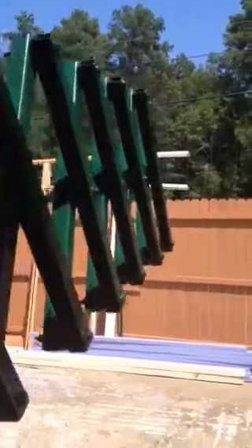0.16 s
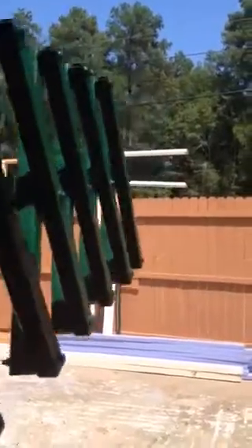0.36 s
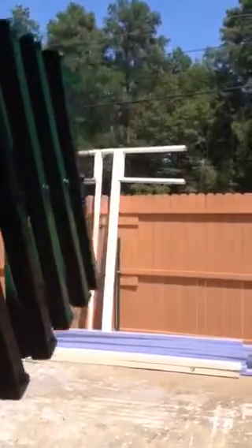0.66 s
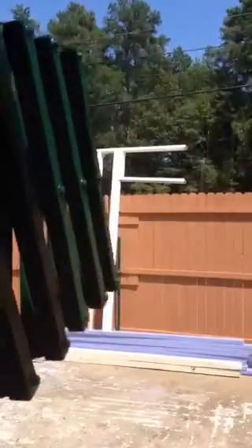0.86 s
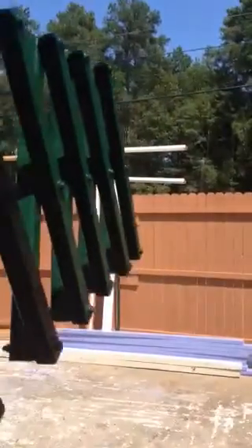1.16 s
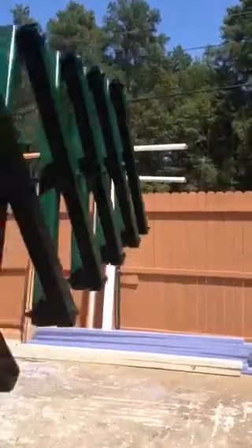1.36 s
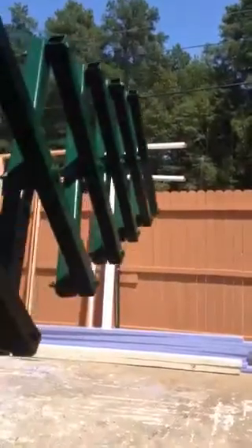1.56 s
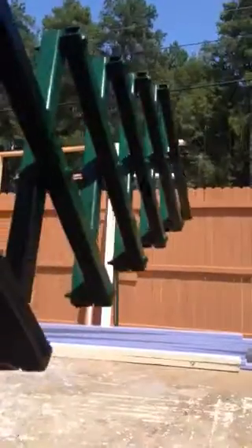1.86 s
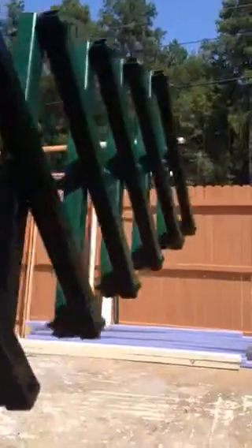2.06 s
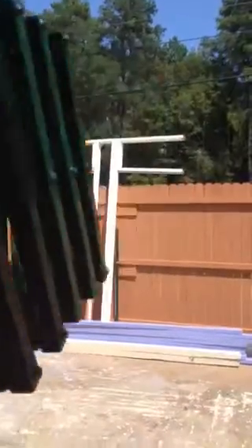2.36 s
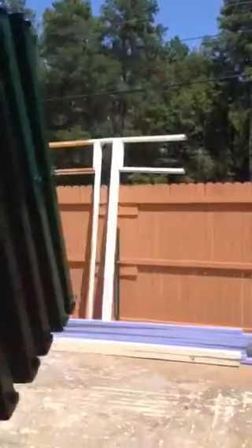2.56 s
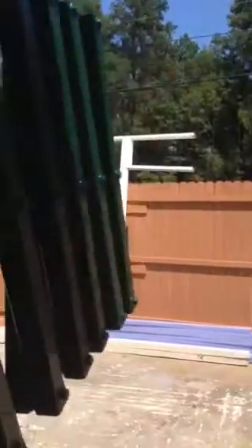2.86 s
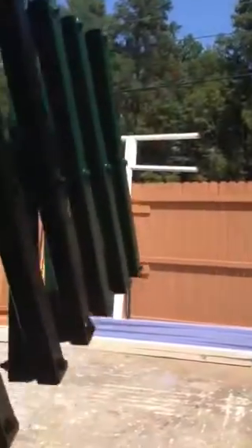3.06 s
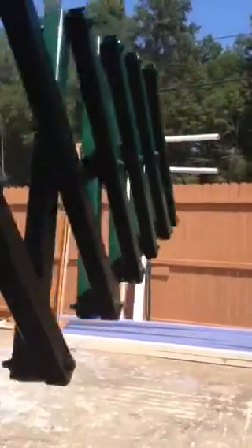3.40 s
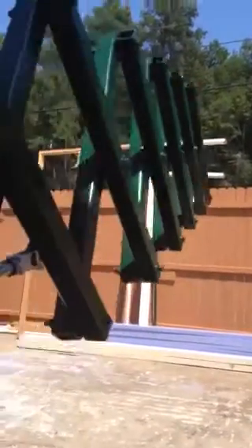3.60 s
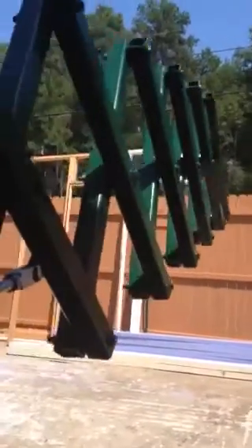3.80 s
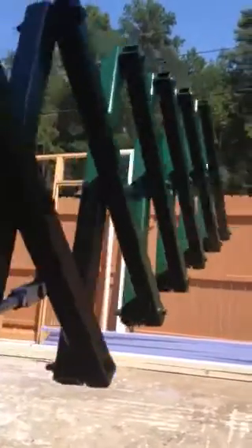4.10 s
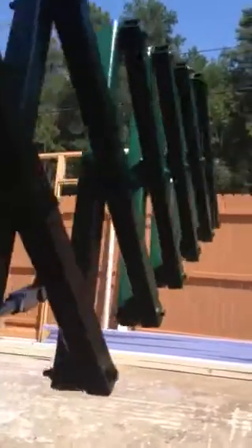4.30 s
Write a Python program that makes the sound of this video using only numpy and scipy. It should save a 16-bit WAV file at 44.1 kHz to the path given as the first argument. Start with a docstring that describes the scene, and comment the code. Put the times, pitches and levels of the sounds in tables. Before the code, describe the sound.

Compressed air hisses in three bursts as a steel linkage moves outdoors, with valve thumps, light clicks and a final hard clanking rattle.

```python
"""An air cylinder pushes and pulls a scissor linkage of steel tubes in a back yard, in three strokes.
Air hisses while the valve is open, the valve thumps, and spent air bleeds away. The joints tick
and rub, and around the last stroke the frame clanks and rattles hard, setting its tubes ringing.
A small engine drones far off under soft air in the trees. One microphone hears it all."""
import sys
import numpy as np
from scipy import signal
from scipy.fft import rfft, irfft
from scipy.io import wavfile
from scipy.ndimage import uniform_filter1d

SR = 44100
rng = np.random.default_rng(int(sys.argv[2]) if len(sys.argv) > 2 else 0)


def output_pcm(signal):
    """Save a mono or channel-first signal as 16-bit PCM at the path in sys.argv[1].

    Samples are clipped to [-1, 1] before scaling.
    """
    pcm = np.clip(np.atleast_2d(signal).T, -1, 1) * 32767
    wavfile.write(sys.argv[1], SR, np.round(pcm).astype(np.int16))


N = 195754
T = np.arange(N) / SR


def stroke_hiss(rush_db=-37, jet_db=1, whistle_db=-8.3, surge_s=.18, whistle_growth_db_per_s=.5):
    """The open valve rushes evenly; the jet and the port's whistle follow the flow of each stroke."""
    # Each row: valve opens and shuts in seconds, flow gain in dB, opening surge in dB,
    # build-up in dB per second (negative fades).
    strokes = [(-.05, .521, -31.5, 0, 5.5), (1.473, 2.301, -39.5, 10, 10.5), (3.943, 4.5, -27.5, -1.5, -9)]
    # Tone of the rush in the valve. Each row: frequency in Hz, gain in dB.
    rush_tone = [(300, -15), (1000, -8), (2300, -4.5), (2750, 0.5), (3600, -0.5), (4300, 3.5), (5500, 2),
                 (7200, 5), (9600, 1), (15500, -3.5)]
    # Tone of the bright jet. Each row: frequency in Hz, gain in dB.
    jet_tone = [(3000, -46), (5500, -23), (7200, -3), (8400, -3), (9800, -3.5), (12400, 3), (14000, 2.5),
                (15500, -3.5)]
    # Resonances of the exhaust port. Each row: frequency in Hz, width in Hz, gain in dB.
    port_peaks = [(6260, 230, 0), (7760, 180, -7)]
    rush = level(colour(rng.standard_normal(N), rush_tone), rush_db)
    jet = level(colour(rng.standard_normal(N), jet_tone), jet_db)
    whistle = level(resonate(rng.standard_normal(N), port_peaks), whistle_db)
    whistle *= undb(-walk(25.1))  # wavers by about 1 dB
    out = np.zeros(N)
    for opens, shuts, db, surge_db, build in strokes:
        age = np.clip(T, opens, shuts) - opens
        flow = undb(db + surge_db * np.exp(-age / surge_s) + build * age)
        exhaust = jet + whistle * undb(whistle_growth_db_per_s * age)
        out += gate(opens, shuts) * (rush + exhaust * flow)
    return out


def bleed(sag_db_per_s=28):
    """Air bleeds from the cylinder in a duller hiss that sags, then drops as the pressure gives out."""
    # Each row: start and end of pressure in seconds, gain in dB, final fall in dB per second.
    bleeds = [(0.512, 0.692, -37, 140), (2.293, 2.472, -37, 135), (3.686, 3.785, -35.5, 270)]
    # Tone of the escaping air. Each row: frequency in Hz, gain in dB.
    bleed_tone = [(300, 0), (1500, 4), (3200, -4), (5500, 0.5), (8400, 4.5), (10000, 3.5), (12800, 4),
                  (15500, 0)]
    hiss = level(colour(rng.standard_normal(N), bleed_tone), db=2)
    out = np.zeros(N)
    for starts, spent, db, fall in bleeds:
        sag_db = sag_db_per_s * (np.clip(T, starts, spent) - starts)
        fall_db = fall * np.maximum(T - spent, 0)
        out += gate(starts, T[-1]) * hiss * undb(db - sag_db - fall_db)
    return out


def gate(opens, shuts, opening_s=.004, closing_s=.026):
    """Air starts almost at once and dies quickly after the valve shuts."""
    return np.clip((T - opens) / opening_s + 1, 0, 1) * np.exp(-np.maximum(T - shuts, 0) / closing_s)


def valve_thumps(front_s=.00016, swing_hz=310, swing_db=4, fade_s=.0027):
    """A sharp pressure front, then a damped swing of the air in the hose."""
    # Each row: time in seconds, level in dB.
    thumps = [(0.5194, -23), (1.473, -32), (1.5459, -21.5), (1.5638, -21), (1.575, -30.5), (2.2998, -23.5)]
    out = np.zeros(N)
    for s, db in thumps:
        front = np.exp(-((T - s) / front_s) ** 2)
        age = np.maximum(T - s - front_s, 0)
        swing = -np.sin(2 * np.pi * swing_hz * age) * np.exp(-age / fade_s)
        out += undb(db) * (front + undb(swing_db) * swing)
    return out


def contact(s, db, hz, octaves, swell_s, fade_s, strike_db=10):
    """Steel meets steel in a shower of tiny impacts peaking at time s; the part's size sets the band."""
    size = 2 ** 15
    lead = size // 2
    age = (np.arange(size) - lead) / SR
    f = np.maximum(np.fft.rfftfreq(size, 1 / SR), 1)
    band = 1 / (1 + (np.log2(f / hz) / octaves) ** 4 / 2) * np.sqrt(hz / (f + hz))
    envelope = np.exp(np.where(age < 0, age / swell_s, -age / fade_s))
    impacts = rng.standard_normal(size)
    impacts[lead] = undb(strike_db)  # the main touch stands out of the shower
    shower = irfft(rfft(impacts) * band) * envelope
    shower *= undb(db) * np.linalg.norm(envelope) / np.linalg.norm(shower)
    return np.pad(shower, (int(s * SR), N))[lead:lead + N]


def clanks(swell_s=.00013, arm_lag_s=.00201):
    """Each hard blow is a wide, brief crack, with the short tone of the struck arm just behind."""
    # Each row: time in seconds, crack level in dB, crack centre in Hz, arm level in dB.
    blows = [(1.465, -35.5, 1214, -48), (2.458, -30, 7000, -50), (3.6622, -14, 2580, -15.5),
             (3.9261, -16.5, 4570, -17.5), (3.951, -20.5, 2900, -47), (4.066, -22.5, 3030, -34)]
    out = np.zeros(N)
    for s, db, hz, arm_db in blows:
        out += contact(s, db, hz, octaves=1.65, swell_s=swell_s, fade_s=.0069)
        out += contact(s + arm_lag_s, arm_db, hz=1560, octaves=.2, swell_s=swell_s, fade_s=.0075)
    return out


def rattles(octaves=1.55, swell_share=.24):
    """Many loose joints chatter at once: a quick swell and a longer fade."""
    # Each row: peak time in seconds, level in dB, centre in Hz, length in seconds.
    bursts = [(.65, -32.5, 1800, 0.0081), (1.562, -37, 1090, 0.02), (2.417, -35.5, 2000, 0.031),
              (2.436, -34, 2000, 0.0065), (2.473, -32.5, 900, 0.044), (2.495, -34, 2500, .022),
              (3.697, -36.5, 750, 0.049), (4.126, -26.5, 624, 0.049), (4.141, -19.5, 2700, 0.038),
              (4.1777, -16.5, 2050, 0.024), (4.199, -19.5, 1510, 0.06)]
    return sum(contact(s, db, hz, octaves, swell_share * length, (1 - swell_share) * length)
               for s, db, hz, length in bursts)


def clink(s, db, hz, swell_s, octaves=.34, cycles=13.3):
    """A part rings for a set number of cycles, so small, high ones stop sooner."""
    return contact(s, db, hz, octaves, swell_s, cycles / hz)


def clicks_and_clinks():
    """Short clicks and clinks of the valve and the joints."""
    # Each row: peak time in seconds, level in dB, centre in Hz, swell in seconds.
    touches = [(.653, -26, 4580, 0.0041), (1.333, -42.5, 4100, .003), (1.4642, -22.5, 6340, 0.00017),
               (1.672, -42.5, 1170, .003), (1.969, -35, 1570, 0.00061), (2.4415, -24.5, 4860, 0.00023),
               (2.5355, -31, 4670, 0.00072), (2.732, -36.5, 2800, 0.0013), (2.9795, -41, 1870, .0002),
               (3.835, -33, 900, .004)]
    return sum(clink(*touch) for touch in touches)


def pings():
    """Now and then a free part sings on with one note."""
    # Each row: peak time in seconds, level in dB, pitch in Hz.
    notes = [(.655, -37.5, 4010), (1.68, -43.5, 960), (1.974, -36, 2710), (2.417, -38, 4180),
             (2.443, -32.5, 4900), (3.768, -30, 1870)]
    return sum(contact(s, db, hz, octaves=.071, swell_s=.0041, fade_s=.014) for s, db, hz in notes)


def rubs(swell_share=.41):
    """A pivot scrapes as it turns, swelling almost as slowly as it fades."""
    # Each row: peak time in seconds, level in dB, centre in Hz, spread in octaves, length in seconds.
    scrapes = [(2.738, -41, 9000, 1.2, 0.032), (3.14, -49, 5000, 1.3, 0.049),
               (3.219, -41, 3170, 0.91, 0.017), (3.455, -56, 8450, .05, 0.087),
               (3.594, -53, 8100, 0.13, 0.079), (3.778, -30, 3660, 0.62, 0.041),
               (3.92, -35, 3760, 1.1, 0.02), (4.099, -32.5, 1570, 0.59, 0.021)]
    return sum(contact(s, db, hz, octaves, swell_share * length, (1 - swell_share) * length)
               for s, db, hz, octaves, length in scrapes)


def ticks(count=7, start_s=2.64, end_s=3.38, db=-50, scatter_db=2, hz=3920, scatter_octaves=.4):
    """Faint clinks at loose intervals while the linkage coasts with the valve shut."""
    slots, step = np.linspace(start_s, end_s, count, endpoint=False, retstep=True)
    out = np.zeros(N)
    for slot in slots:
        late, loud, high = rng.uniform(-1, 1, 3)
        s = slot + step * (1 + late) / 2
        out += clink(s, db + scatter_db * loud, hz * 2 ** (scatter_octaves * high), swell_s=.0047)
    return out


def frame(contacts, ring_db=-15, thicket_db=-11, thicket_t60_s=.42):
    """Each contact sounds directly, then the tubes ring in strong modes over a thicket of weak ones."""
    # Modes of the steel tubes. Each row: frequency in Hz, relative level in dB, seconds to fall 60 dB.
    tube_modes = [(388, -7, .22), (667, 0, .28), (750, -2, .3), (838, -1, .4), (893, -3, .35),
                  (975, -4, .3), (1082, -7, .35), (1318, -3, .25), (1375, -4, .22), (1497, -1, .25),
                  (1695, -3, .25), (1945, -3, .3), (2080, -6, .3), (2257, -2, .28), (2311, 0, .22),
                  (2660, -2, .22), (2736, -2, .24), (2929, 0, .35), (3130, -5, .3), (3356, -1, .26),
                  (3548, 0, .26), (4030, -3, .35), (4090, -4, .3), (4720, -6, .22), (5130, -7, .22)]
    t = T[:SR]
    ring = sum(undb(db - 60 * t / t60) * np.sin(2 * np.pi * hz * t + rng.uniform(0, 2 * np.pi))
               for hz, db, t60 in tube_modes)
    thicket = colour(rng.standard_normal(SR), [(150, -1), (500, -1), (1500, 0), (5000, -2), (12000, -7)])
    thicket *= undb(-60 * t / thicket_t60_s)
    body = undb(ring_db) * ring / np.linalg.norm(ring)
    body += undb(thicket_db) * thicket / np.linalg.norm(thicket)
    return contacts + signal.fftconvolve(contacts, body)[:N]


def shudder(blows, fade_s=.028, below_hz=800, shake_db=-7.5):
    """The low part of every heavy blow bends the long arms, which thud on briefly."""
    push = signal.sosfilt(signal.butter(2, below_hz, fs=SR, output="sos"), blows)
    decay = np.exp(-2 / (fade_s * SR))
    force = np.sqrt(signal.lfilter([1 - decay], [1, -decay], push ** 2 + 1e-18))  # envelope of the push
    thud_tone = [(60, -36), (120, -6.5), (200, 9.0), (380, 1.5), (700, 4), (2000, -46)]
    return force * level(colour(rng.standard_normal(N), thud_tone), shake_db)


def reflect(x):
    """Short echoes off the nearby steel and the slab ripple the machine's tone."""
    # Each row: delay in seconds, gain in dB.
    echoes = [(.00105, -32), (.0029, -27.5), (.0062, -14.5)]
    return x + sum(undb(db) * np.pad(x, (int(delay * SR), 0))[:N] for delay, db in echoes)


def engine(firing_hz=28.84, wander=.0015, scatter_db=2, db=-52):
    """Uneven firings ring a far engine's exhaust and casing, each part at its own moment of the cycle."""
    # Resonances of those parts. Each row: frequency in Hz, width in Hz, gain in dB.
    parts = [(159.6, 12.2, -3.5), (228.1, 3.3, -1.5), (263.9, 10, -1), (313, 1.8, -6.5), (425.6, 11, 2),
             (472.4, 15.6, -5.5), (582, 26, -4), (773, 47, -8.5), (893, 3.9, -6.5), (979.5, 8.9, 1)]
    cycles = np.cumsum(firing_hz * (1 + wander * walk(3))) / SR
    strength = undb(scatter_db * rng.standard_normal(N))
    drone = np.zeros(N)
    for part in parts:
        firings = np.diff(np.floor(cycles + rng.uniform()), prepend=0)
        drone += resonate(strength * firings, [part])
    # distance takes the treble, the small casing radiates little bass
    return level(colour(drone, [(50, -37), (150, 2), (1000, -9.5), (2000, -46)]), db)


def yard(db=-48, sway_db=.3):
    """A soft, even bed of air in the trees."""
    # Tone of the open air. Each row: frequency in Hz, gain in dB.
    yard_tone = [(25, -36), (50, 7.5), (90, -3), (160, 2.5), (420, 2), (900, -2.5), (1250, -5.5),
                 (2500, -10), (4200, -10), (5700, -13.5), (9000, -9), (10500, -11.5), (13500, -10),
                 (15500, -12.5)]
    sway = undb(sway_db * walk(5))
    return level(colour(rng.standard_normal(N), yard_tone), db) * sway


def undb(db):
    """Decibels to gain."""
    return 10 ** (np.asarray(db) / 20)


def level(x, db):
    """Set the rms level."""
    return x * undb(db) / np.sqrt(np.mean(x ** 2))


def colour(x, points):
    """Equalise along a curve of (Hz, dB) points."""
    hz, db = np.transpose(points)
    f = np.maximum(np.fft.rfftfreq(len(x), 1 / SR), 1)
    return irfft(rfft(x) * undb(np.interp(np.log(f), np.log(hz), db)), len(x))


def resonate(x, peaks):
    """Ring a bank of parallel band-passes."""
    return sum(undb(db) * signal.lfilter(*signal.iirpeak(hz, hz / width, fs=SR), x)
               for hz, width, db in peaks)


def walk(rate):
    """A smooth random drift that changes rate times a second, with an rms of 1."""
    hold = int(SR / rate)
    steps = np.repeat(rng.standard_normal(N // hold + 1), hold)
    return level(uniform_filter1d(uniform_filter1d(steps, hold), hold)[:N], 0)


def scene(flutter_db=.35, machine_db=.83):
    """The machine up close, engine and yard behind, the same on both channels."""
    heavy = clanks() + rattles()
    light = clicks_and_clinks() + pings() + rubs() + ticks()
    air = (stroke_hiss() + bleed()) * undb(flutter_db * walk(26.8))
    machine = air + valve_thumps() + frame(heavy + light) + shudder(heavy)
    mono = undb(machine_db) * reflect(machine) + engine() + yard()
    return np.array([mono, mono])


def record(dry, low_hz=105, top_hz=15300):
    """The phone's microphone thins the bass and cuts the top."""
    thin = signal.sosfilt(signal.butter(4, low_hz, "high", fs=SR, output="sos"), dry)
    return signal.sosfilt(signal.ellip(12, .1, 80, top_hz, fs=SR, output="sos"), thin)


dry = scene()
out = record(dry)
output_pcm(out)
```